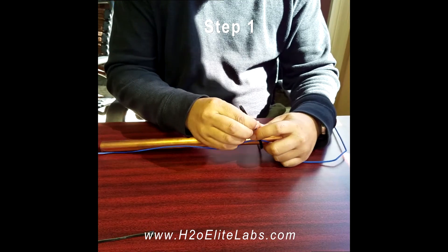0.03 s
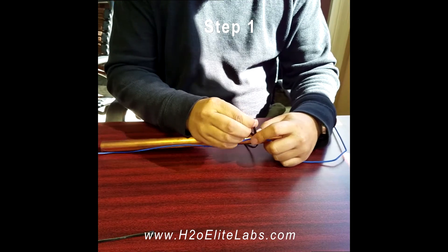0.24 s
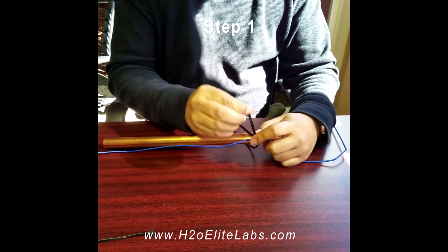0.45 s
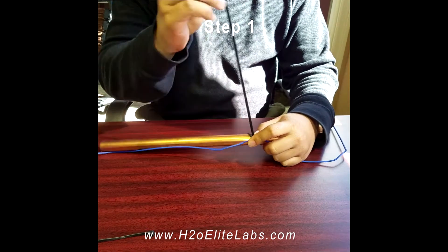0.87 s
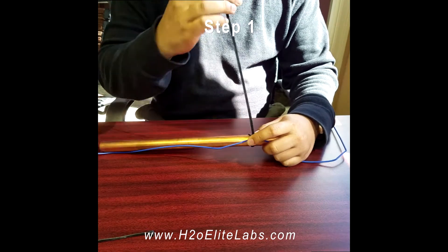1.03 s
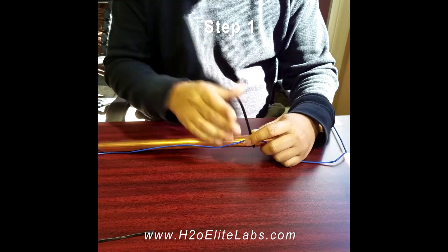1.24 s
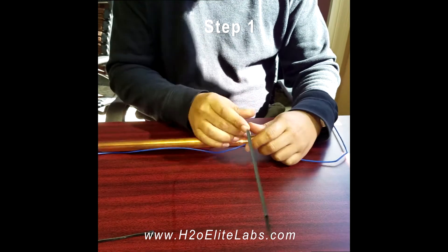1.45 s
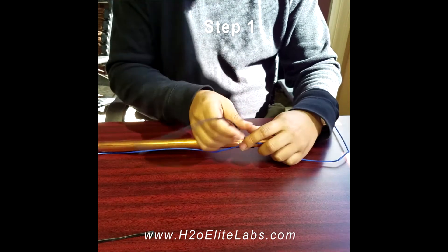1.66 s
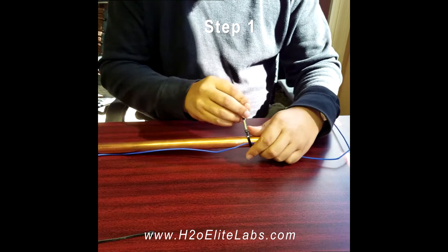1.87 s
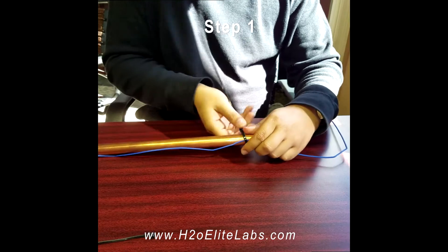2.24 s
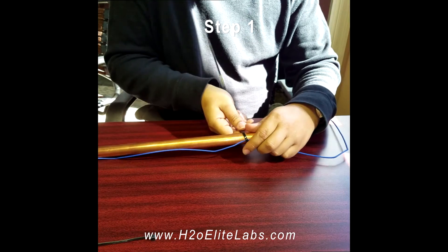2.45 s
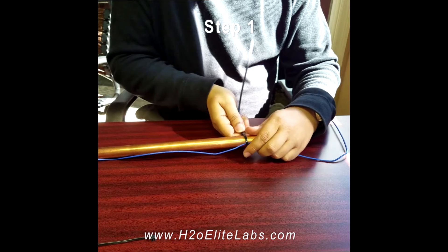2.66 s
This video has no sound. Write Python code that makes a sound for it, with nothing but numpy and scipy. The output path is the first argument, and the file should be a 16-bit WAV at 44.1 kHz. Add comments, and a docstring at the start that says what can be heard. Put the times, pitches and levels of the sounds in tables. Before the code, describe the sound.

A plastic cable tie clicks over its first teeth, then zips tight around a metal pipe with a buzzing rasp. The pipe knocks and scrapes lightly, then thumps dully on a wooden table, close by in a small room.

```python
"""A plastic cable tie is pulled tight round a metal pipe on a wooden table in a small room.
From 0.23 s the pawl clicks over the first teeth; from 0.41 s it buzzes as the strap rasps through,
speeds up and slows. Near 0.9 s the tie seats and jerks the pipe, which pings lightly and scrapes
hollowly on the table. Fingers tap and rub; at 2.17 s the pipe is set down with a dull thump
that rings the table top, and a last scrape fades."""
import sys
import numpy as np
from scipy import signal
from scipy.fft import rfft, irfft
from scipy.io import wavfile
from scipy.ndimage import uniform_filter1d

SR = 44100
rng = np.random.default_rng(int(sys.argv[2]) if len(sys.argv) > 2 else 0)


def put_to_file(sound):
    """Save the sound as 16-bit audio at rate SR, in the file named by the first command-line argument."""
    columns = np.atleast_2d(sound).T  # one column per channel
    safe = np.clip(columns, -1, 1)
    whole_steps = np.round(safe * 32767)
    wavfile.write(sys.argv[1], SR, whole_steps.astype(np.int16))


N = 119070
T = np.arange(N) / SR

# Spectrum of running snaps and pipe ticks (frequency [Hz], density [dB])
TICK_SPECTRUM = [(200, -24), (1500, -17), (3000, -7), (4800, -5.5), (7000, -5), (8500, -3.5), (10300, -0.5),
                 (12000, -3.5), (14000, 2), (15650, 4), (16300, -54)]


def zip_run():
    """Teeth run under the pawl: bright snaps and a buzz pitched at the tooth rate."""
    # Long pull (time [s], tooth rate [1/s], snap level [dB], buzz level [dB])
    pull = [(.41, 220, -32.5, -53.5), (.45, 268, -38.5, -46.5), (.5, 301, -36.5, -42),
            (.545, 330, -44.5, -45.5), (.575, 763, -34, -38.5), (.625, 700, -42, -39),
            (.66, 824, -43, -37.5), (.7, 645, -38.5, -39.5), (.735, 575, -37, -41.5), (.775, 530, -34, -46),
            (.81, 440, -45.5, -44), (.845, 353, -60, -45), (.9, 299, -60, -44), (.96, 150, -84, -54.5),
            (1.06, 64, -72, -63.5)]
    # Strap buzz (frequency [Hz], density [dB])
    buzz_spectrum = [(100, -43), (200, -18), (290, -0.5), (350, 1), (420, -17.5), (500, 1), (620, -2),
                     (850, -3.5), (960, -6), (1400, -3), (2000, -8.5), (3000, -13), (5000, -19.5),
                     (8000, -42), (16000, -46)]
    rate_jitter, tooth_spread_db = .08, 3
    wobble = unit(uniform_filter1d(rng.standard_normal(N), size=110))
    rate_hz = curve(pull) * np.exp(rate_jitter * wobble)
    pulling = (T > pull[0][0]) * (T < pull[-1][0])
    teeth = np.diff(np.floor(np.cumsum(rate_hz * pulling) / SR), prepend=0)
    hits = teeth * np.sqrt(SR / rate_hz) * amp(tooth_spread_db * rng.standard_normal(N))
    snap = colour(cracks(hits * amp(curve(pull, column=2)), spread_s=0.000933), TICK_SPECTRUM)
    buzz = colour(hits * amp(curve(pull, column=3)), buzz_spectrum)
    return (amp(-0.5) * room(snap, wet_db=9.5, direct_pan_db=15.5, wet_pan_db=-1.5)
            + room(buzz, wet_db=5, direct_pan_db=4.5, wet_pan_db=-4))


def first_teeth():
    """The pawl snaps over single teeth; the brightest part beams left, the rest fills the room."""
    # Teeth passing the pawl (time [s], level [dB])
    teeth = [(0.2287, -5.5), (0.2307, 0), (0.2306, -2), (0.232, -5), (0.2339, -2), (0.238, -9),
             (0.2381, -6), (0.2452, -4), (.2522, -5), (.2685, 0), (0.3322, -3.5), (0.335, -5.5),
             (0.3419, -1), (0.3548, -5), (0.3714, -6), (0.3914, -10), (0.3948, -4.5), (0.4019, -4),
             (.4052, -7), (.4098, -9)]
    # Snap, beamed and diffuse (frequency [Hz], density [dB])
    beam_spectrum = [(200, -47), (3000, -20), (4800, -13.5), (8500, -12), (10500, -3.5), (12500, -4.5),
                     (14000, 3.5), (15400, 5), (16500, -10)]
    diffuse_spectrum = [(200, -19.5), (1500, -18.5), (3000, -15.5), (4800, -10.5), (6500, -13.5),
                        (8500, -12.5), (10300, -4), (12000, -6.5), (15200, 4.5), (16500, -2)]
    crack_s = .0018
    hits = np.zeros(N)
    for time_s, db in teeth:
        add(hits, time_s - crack_s / 2, amp([db]))
    snaps = cracks(hits, crack_s)
    beam = colour(snaps, beam_spectrum) * amp([[0], [-19]])
    diffuse = room(colour(snaps, diffuse_spectrum), wet_db=22, direct_pan_db=1, wet_pan_db=-3)
    return amp(-3) * (beam + diffuse)


def strap_rub():
    """The ribbed strap rasps through the lock; its resonance sinks as the free length grows."""
    # Rubbing in the lock (time [s], level [dB], resonance [Hz])
    rubbing = [(.22, -63, 5000), (.24, -46, 4800), (.32, -46.5, 4700), (.38, -36.5, 4300),
               (.46, -32.5, 4100), (.55, -33.5, 4330), (.63, -30.5, 3600), (.68, -36, 2760),
               (.73, -39, 2500), (.81, -43.5, 2300), (.92, -70, 1660), (1.1, -65.5, 1470)]
    # Rasp (frequency [Hz], density [dB])
    rasp_spectrum = [(200, -11), (900, -3.5), (1400, 2.5), (2200, -0.5), (3500, -1), (4700, -2),
                     (6000, -12.5), (8000, -16.5), (16000, -10)]
    slips = friction(slips_per_s=4000, spread_db=4)
    resonance = resonate(slips, curve(rubbing, column=2), width_hz=890)
    rasp = colour(slips, rasp_spectrum) + amp(-6) * resonance
    return room(rasp * amp(curve(rubbing) - 8), wet_db=8, direct_pan_db=-11, wet_pan_db=1.5)


def strap_swoop():
    """Friction drives a broad low resonance that falls as the strap lengthens."""
    # Low strap resonance (time [s], level [dB], frequency [Hz])
    swoop = [(.42, -72, 1120), (.51, -45, 974), (.57, -43.5, 820), (.62, -42.5, 700), (.69, -40.5, 697),
             (.74, -47, 597), (.8, -41, 479.8), (.86, -46, 400), (.95, -73, 340)]
    hz, stage_width_hz = curve(swoop, column=2), 305
    slips = friction(slips_per_s=3000, spread_db=2.5)
    band = resonate(resonate(slips, hz, stage_width_hz), hz, stage_width_hz)
    return room(band * amp(curve(swoop)), wet_db=1, direct_pan_db=-2, wet_pan_db=-2.5)


def pipe_jerks():
    """The strap comes tight and jerks the pipe: low knocks."""
    # Jerks (time [s], level [dB])
    jerks = [(0.9199, -26), (0.945, -34), (.983, -34.5), (1.01, -44)]
    knock_hz, rise_s = 275, 0.007
    knock = (T / rise_s * np.exp(1 - T / rise_s)) ** 2 * np.sin(2 * np.pi * knock_hz * T)
    out = np.zeros(N)
    for time_s, db in jerks:
        add(out, time_s, amp(db) * knock)
    return out * pan(-4.5)


def table_thump():
    """A soft blow rings the table top; the pipe settles with a short shudder."""
    # Table modes (frequency [Hz], level [dB], t60 [s])
    modes = [(120.4, -1, 0.32), (162.5, -5, 0.38), (237, 1, 0.13), (340, -18.5, 0.11), (460, -11, 0.18),
             (532, -2.5, 0.34), (618, 7, 0.12), (834, 2, 0.11), (872, -0.5, 0.098), (1009, -12, 0.2),
             (1160, -25, 0.22)]
    # Blow (frequency [Hz], density [dB])
    thud_spectrum = [(40, -12), (120, -10), (260, -10), (600, 3), (930, -4), (1120, -7.5), (1400, -22),
                     (2500, -48), (16000, -49)]
    onset_s, attack_s, shudder_s, push_s = 2.1688, 0.004, 0.022, .0001
    ring = sum(amp(db - 60 * T / t60_s) * np.sin(2 * np.pi * hz * T) * (-1) ** k
               for k, (hz, db, t60_s) in enumerate(modes))
    shudder = colour(rng.standard_normal(N) * np.exp(-T / shudder_s), thud_spectrum)
    push = colour(np.exp(-T / push_s), thud_spectrum)
    top, blow = np.zeros(N), np.zeros(N)
    add(top, onset_s, amp(-34) * ring * (1 - np.exp(-T / attack_s)))
    add(blow, onset_s, amp(-30.5) * shudder - amp(-16) * push)
    return top * pan(-0.5) + room(blow, wet_db=-1, direct_pan_db=6, wet_pan_db=-5.5)


def pipe_scrape():
    """Slips on the table sound the hollow pipe."""
    # Scrape envelope (time [s], level [dB])
    scrape = [(0, -48), (.06, -67.5), (.37, -59), (.43, -55), (.455, -41), (.515, -43), (.72, -53),
              (.8, -48.5), (.87, -35.5), (.935, -38), (.99, -47.5), (1.05, -49), (1.18, -61.5),
              (1.33, -57.5), (1.44, -55), (1.58, -73), (1.68, -67), (1.76, -60.5), (1.82, -61),
              (1.935, -44.5), (2.06, -56.5), (2.13, -54), (2.33, -50.5), (2.385, -41.5), (2.48, -52.5),
              (2.7, -66.5)]
    # Modes of the pipe on the table (frequency [Hz], width [Hz], level [dB])
    modes = [(236.6, 27, -13.5), (282.6, 32, -1.5), (309.7, 21, -5), (345.6, 12.6, -3), (489.7, 33, -10.5),
             (612, 15.5, -12.5), (847, 13, -3), (970, 78, -14.5), (1117, 62, -13.5), (1470, 170, -20),
             (2100, 140, -28.5)]
    # Grit (frequency [Hz], density [dB])
    grit_spectrum = [(60, -22), (190, -5), (270, 0.5), (350, -1), (420, -11.5), (500, 3.5), (720, -5),
                     (1000, -0.5), (1500, -9), (2500, -16.5), (4000, -26), (7000, -35.5), (11000, -25),
                     (16000, -29)]
    slips = friction(slips_per_s=3000, spread_db=1.5)
    ring = np.zeros(N)
    for k, (hz, width_hz, db) in enumerate(modes):
        decay = amp(db) * np.sqrt(width_hz) * np.exp(-np.pi * width_hz * T)
        ring += decay * np.sin(2 * np.pi * hz * T) * (-1) ** k
    hollow = unit(signal.fftconvolve(slips, ring)[:N])
    grit = amp(-9.5) * colour(friction(slips_per_s=2700, spread_db=4), grit_spectrum)
    return room(hollow + grit, wet_db=1, direct_pan_db=-6, wet_pan_db=1) * amp(curve(scrape))


def light_rubs():
    """Fingers, strap and pipe rub: swells of friction, each with one ringing band."""
    # Swells (centre [s], sigma [s], level [dB], resonance [Hz], width [Hz], relative hiss [dB])
    swells = [(.008, 0.01, -59, 1130, 150, 6), (0.115, .081, -68, 1130, 150, 2.5),
              (0.531, 0.049, -44, 281, 45, -25), (0.898, 0.029, -55, 3570, 181, -9),
              (0.903, 0.021, -41, 850, 30.3, -27), (0.892, 0.043, -41, 317, 91, -25),
              (1.385, 0.072, -61, 864, 25.4, -17), (1.95, .04, -52, 860, 25.3, -17),
              (1.967, .018, -60.5, 1350, 250, 4), (2.378, .011, -63, 2150, 150, 0),
              (2.39, 0.04, -48, 279, 49.7, -21)]
    # Friction hiss (frequency [Hz], density [dB])
    hiss_spectrum = [(200, 0), (1100, -2.5), (2200, -0.5), (3400, -1), (6000, -17), (10000, -22),
                     (16000, -23)]
    out = np.zeros(N)
    for centre_s, sigma_s, db, hz, width_hz, hiss_db in swells:
        slips = friction(slips_per_s=1700, spread_db=0.5)
        band = resonate(resonate(slips, hz, 2 * width_hz), hz, 2 * width_hz)
        hiss = amp(hiss_db) * colour(slips, hiss_spectrum)
        out += amp(db) * gaussian(centre_s, sigma_s) * (hiss + band)
    return room(out, wet_db=-1, direct_pan_db=-6, wet_pan_db=-4.5)


def pipe_pings():
    """Light pings of the pipe as it is tapped or rubbed: a tick and a short, high metallic ring."""
    # Pings (time [s], ring level [dB], tick level [dB])
    pings = [(.091, -62, -54.5), (.876, -53.5, -64), (.915, -59, -64), (1.5103, -54, -47.5)]
    # Metal modes (frequency [Hz], level [dB], t60 [s])
    modes = [(3664, 2.5, 0.14), (3660, -16, .12), (5840, -10, .09), (8100, -25, .15), (9114, -4, 0.17),
             (10050, 3, 0.19), (10280, 1, 0.12), (10770, -3, 0.092), (11960, -6, .13), (12830, -5, .1),
             (14230, -11, .09), (14980, -5, 0.089)]
    tick_decay_s = 0.0028
    ring = sum(amp(db - 60 * T / t60_s) * np.sin(2 * np.pi * hz * T) for hz, db, t60_s in modes)
    rings, ticks = np.zeros(N), np.zeros(N)
    for time_s, ring_db, tick_db in pings:
        tick = colour(rng.standard_normal(N) * np.exp(-T / tick_decay_s), TICK_SPECTRUM)
        add(rings, time_s, amp(ring_db) * ring)
        add(ticks, time_s, amp(tick_db) * tick)
    return (amp(1) * room(rings, wet_db=-7, direct_pan_db=-3.5, wet_pan_db=-5)
            + room(ticks, wet_db=9, direct_pan_db=14, wet_pan_db=-3))


def finger_taps():
    """Dull, dry taps, each a very short tone pulse."""
    # Taps (time [s], level [dB], frequency [Hz], sigma [s], L-R [dB])
    taps = [(1.134, -50.5, 1433, 0.00096, -7), (1.655, -38.5, 690, 0.00028, -10.5),
            (2.0495, -48.5, 1480, 0.00093, -15)]
    return sum(pan(pan_db) * amp(db) * gaussian(time_s, sigma_s) * np.cos(2 * np.pi * hz * (T - time_s))
               for time_s, db, hz, sigma_s, pan_db in taps)


def room_tone():
    """Quiet room noise and a low hum."""
    # Room noise (frequency [Hz], density [dB])
    noise_spectrum = [(12, -30), (20, -3), (38, -2.5), (138, 4), (216, -9), (337, -8.5), (459, -16.5),
                      (738, -19.5), (849, -17), (1610, -37.5), (3340, -25), (3900, -39), (6180, -44),
                      (12400, -31.5), (16000, -32)]
    # Hum tones (frequency [Hz], level [dB])
    tones = [(80.7, -68), (119, -68)]
    noise = cohere(np.array([colour(white, noise_spectrum) for white in rng.standard_normal((2, N))]))
    hum = sum(amp(db) * np.sqrt(2) * np.sin(2 * np.pi * (hz * T + rng.random())) for hz, db in tones)
    return (amp(-58.5) * noise + hum) * pan(-1.4)


def room(x, wet_db, direct_pan_db, wet_pan_db, size=24000):
    """Direct sound plus a dense small-room tail, sharing unit energy."""
    # Reverberation (frequency [Hz], t60 [s])
    decay = [(100, 0.83), (300, 0.5), (1000, 0.46), (4000, 0.28), (10000, 0.29), (16000, 0.15)]
    hz, time_s, bins = signal.stft(rng.standard_normal((2, size)), SR, nperseg=256)
    bins = bins * amp(-60 * time_s / at_hz(decay, hz)[:, None])
    tail = cohere(signal.istft(bins, SR, nperseg=256)[1])
    tail *= np.clip((T[:tail.shape[1]] - .001) / 0.0012, 0, 1)  # pre-delay, fade-in
    wet = signal.fftconvolve(x[None], tail / np.linalg.norm(tail[0]), axes=1)[:, :N]
    return (x * pan(direct_pan_db) + amp(wet_db) * wet * pan(wet_pan_db)) / np.hypot(1, amp(wet_db))


def cohere(x):
    """Makes two unrelated channels alike in the bass, as at two close microphones."""
    # Left-right likeness (frequency [Hz], correlation [0..1])
    likeness = [(50, 0.85), (150, 0.94), (300, 0.94), (600, 0.4), (1200, 0.31), (16000, 0)]
    left, right = rfft(x)
    shared = np.clip(at_hz(likeness, np.fft.rfftfreq(x.shape[1], 1 / SR)), -1, 1)
    return irfft(np.array([left, shared * left + np.sqrt(1 - shared ** 2) * right]), x.shape[1])


def cracks(hits, spread_s, size=256):
    """Each hit becomes a tiny plastic crack, its frequencies scattered in arrival time."""
    out, onsets, bands = np.zeros(N), np.flatnonzero(hits), 24
    band_of_bin = np.linspace(0, bands - 1, size // 2 + 1)
    for i, scatter in zip(onsets, rng.random((len(onsets), bands))):
        delay_s = spread_s * np.interp(band_of_bin, np.arange(bands), scatter)
        add(out, i / SR, hits[i] * irfft(np.exp(-2j * np.pi * np.cumsum(delay_s) * SR / size)))
    return out


def friction(slips_per_s, spread_db):
    """Dense slips of random size."""
    slips = rng.standard_normal(N) * (rng.random(N) < slips_per_s / SR)
    return unit(slips * amp(spread_db * np.minimum(rng.exponential(1, N), 4)))


def resonate(x, hz, width_hz):
    """Steady or gliding resonance, rms 1."""
    carrier = np.exp(2j * np.pi * np.cumsum(hz * np.ones(N)) / SR)
    pole = np.exp(-np.pi * width_hz / SR)
    return unit((carrier * signal.lfilter([1 - pole], [1, -pole], x / carrier)).real)


def colour(x, spectrum, size=2048):
    """Minimum-phase filter of unit energy."""
    log_gain = np.log(amp(at_hz(spectrum, abs(np.fft.fftfreq(size, 1 / SR)))))
    impulse = np.fft.ifft(np.exp(np.conj(signal.hilbert(log_gain)))).real
    return signal.fftconvolve(x, impulse / np.linalg.norm(impulse))[:len(x)]


def at_hz(table, hz):
    """Reads a table on a log-frequency axis."""
    table_hz, values = np.transpose(table)
    return np.interp(np.log(hz + 1), np.log(table_hz + 1), values)


def curve(rows, column=1):
    """One column of a time table, per sample."""
    rows = np.array(rows)
    return np.interp(T, rows[:, 0], rows[:, column])


def gaussian(centre_s, sigma_s):
    """Bell envelope, peak 1."""
    return np.exp(-((T - centre_s) / sigma_s) ** 2 / 2)


def add(mix, time_s, sound):
    """Mixes a sound in place."""
    part = mix[..., round(time_s * SR):][..., :sound.shape[-1]]
    part += sound[..., :part.shape[-1]]


def pan(db):
    """Stereo gains for an L-R difference."""
    return amp([[db / 2], [-db / 2]])


def amp(db):
    """Decibels to gain."""
    return 10 ** (np.asarray(db) / 20)


def unit(x):
    """Scales to rms 1."""
    return x / np.sqrt(np.mean(x ** 2) + 1e-20)


def scene():
    """Stereo sum of all sources."""
    tie = first_teeth() + zip_run() + strap_rub() + strap_swoop()
    handling = pipe_jerks() + pipe_scrape() + light_rubs() + pipe_pings() + finger_taps()
    return tie + handling + table_thump() + room_tone()


def record(dry):
    """Two slightly unlike microphones, then a low-pass."""
    # Microphone imbalance (frequency [Hz], L-R [dB])
    imbalance = [(60, -1), (130, -1), (300, -2.5), (600, 0), (1200, -6), (2400, 0.5), (4500, -3), (9000, 0),
                 (15000, 5)]
    left_lead_s, cutoff_hz = 0.00017, 16300
    hz = np.fft.rfftfreq(N, 1 / SR)
    side = amp(at_hz(imbalance, hz) / 2)
    response = np.array([side * np.exp(2j * np.pi * hz * left_lead_s), 1 / side])
    heard = irfft(rfft(dry) * response, N)
    lowpass = signal.firwin(201, cutoff_hz, window=("kaiser", 9), fs=SR)
    return signal.oaconvolve(heard, lowpass[None], "same")


dry = scene()
out = record(dry)
put_to_file(out)
```